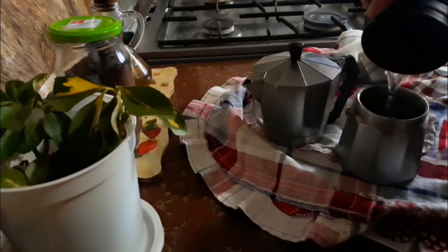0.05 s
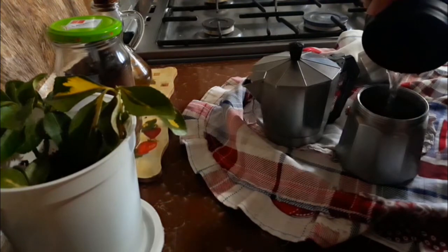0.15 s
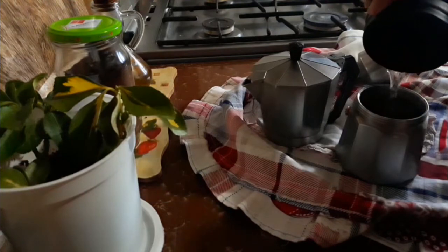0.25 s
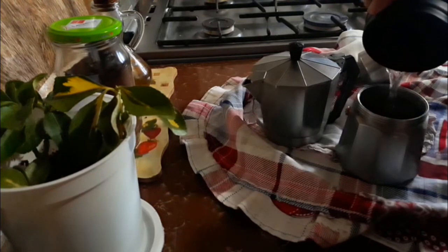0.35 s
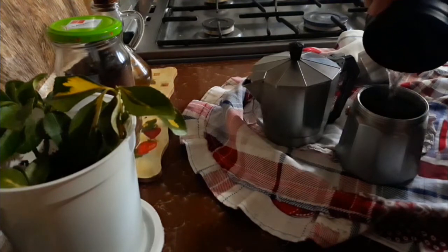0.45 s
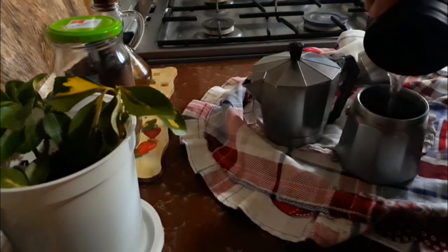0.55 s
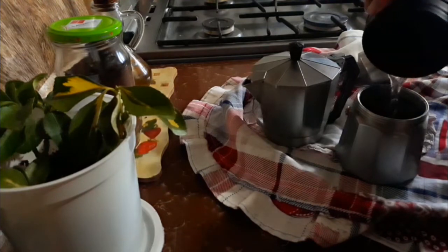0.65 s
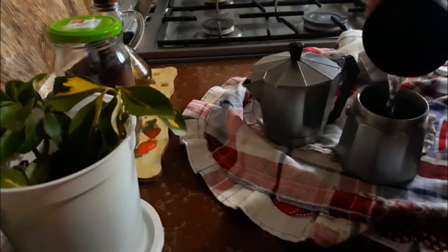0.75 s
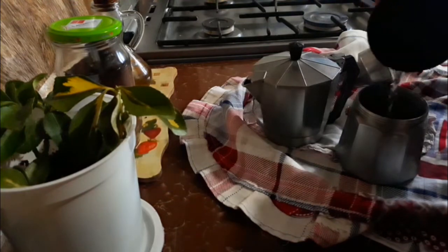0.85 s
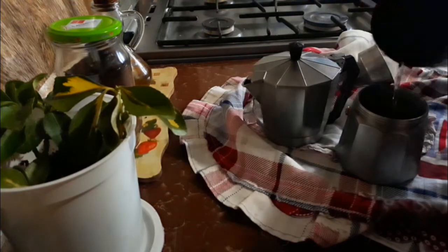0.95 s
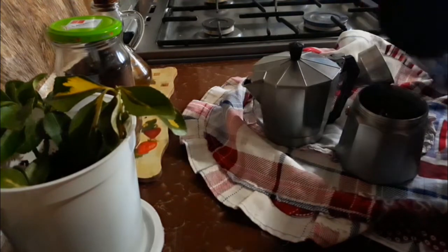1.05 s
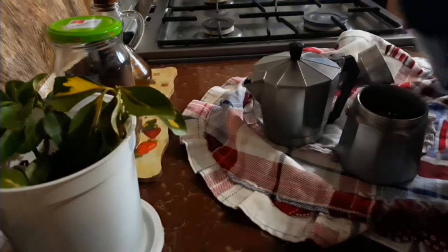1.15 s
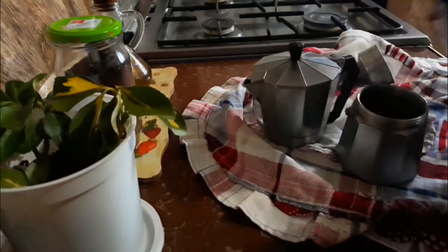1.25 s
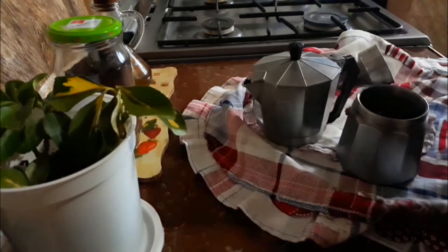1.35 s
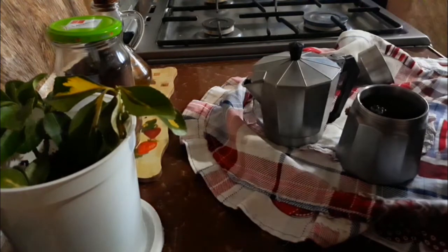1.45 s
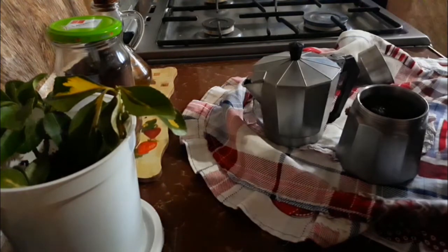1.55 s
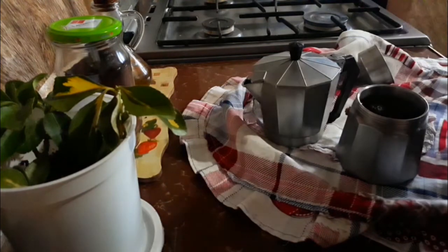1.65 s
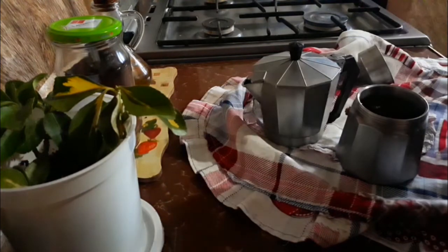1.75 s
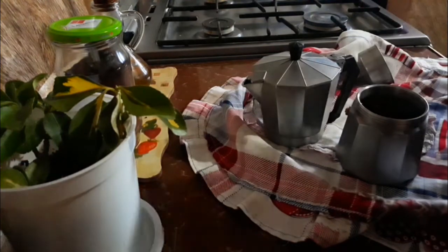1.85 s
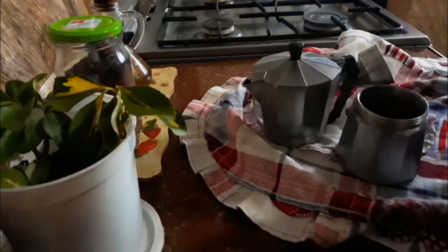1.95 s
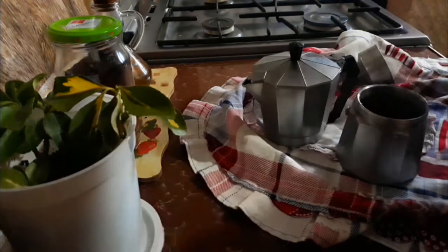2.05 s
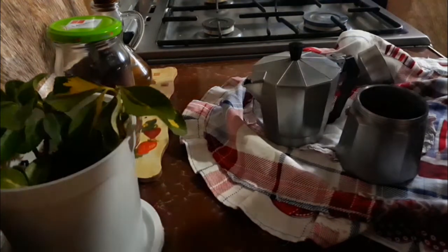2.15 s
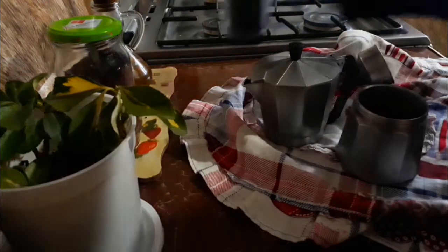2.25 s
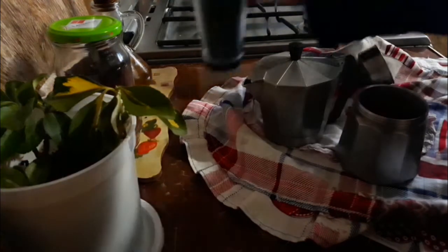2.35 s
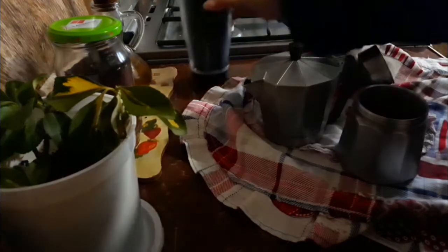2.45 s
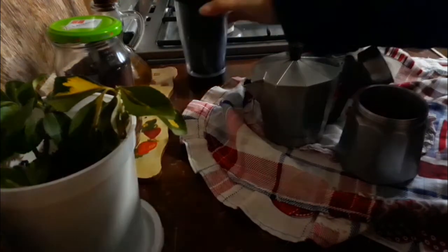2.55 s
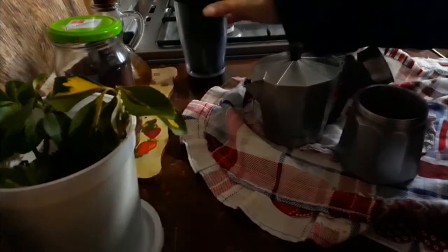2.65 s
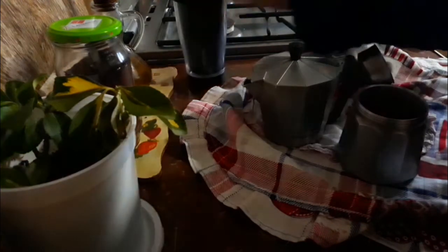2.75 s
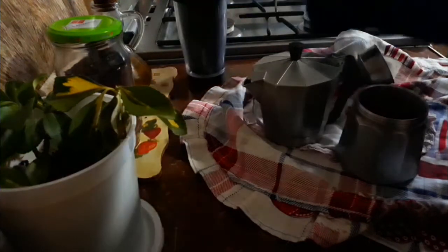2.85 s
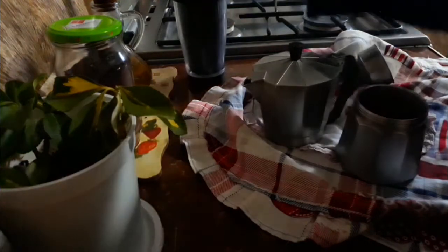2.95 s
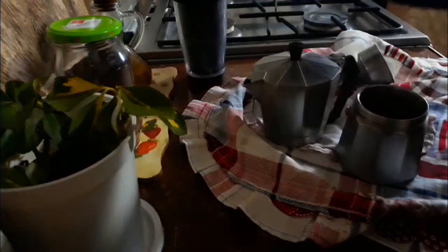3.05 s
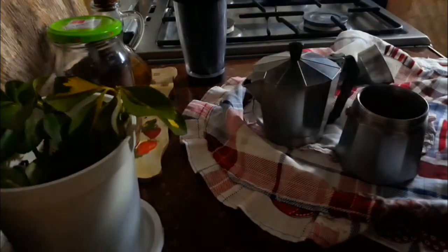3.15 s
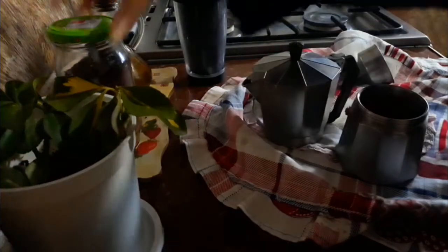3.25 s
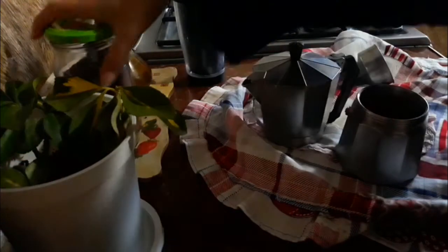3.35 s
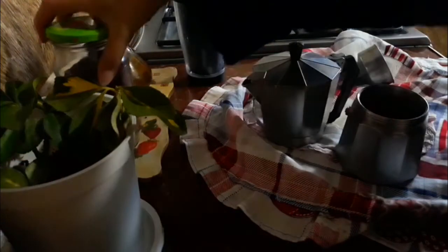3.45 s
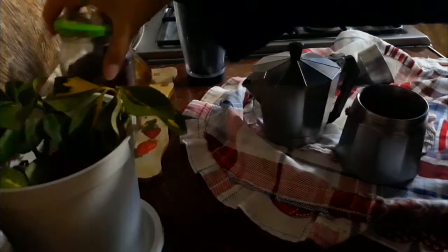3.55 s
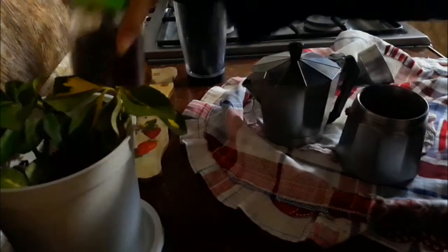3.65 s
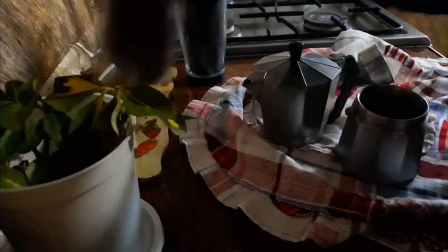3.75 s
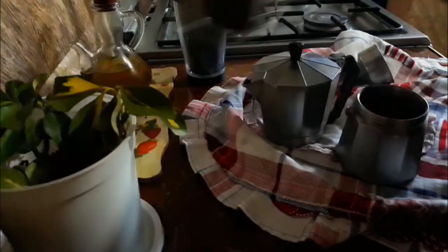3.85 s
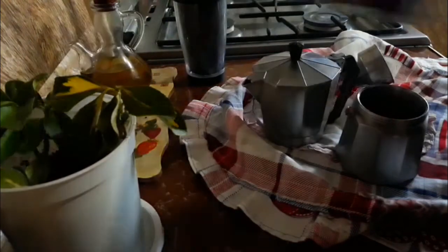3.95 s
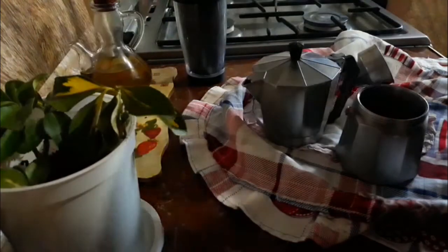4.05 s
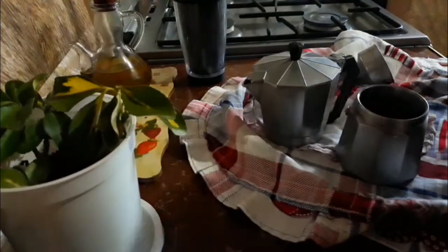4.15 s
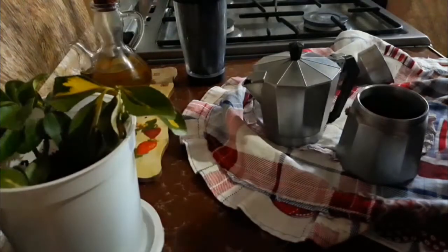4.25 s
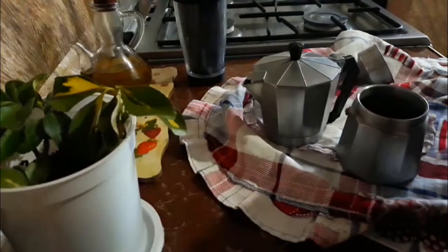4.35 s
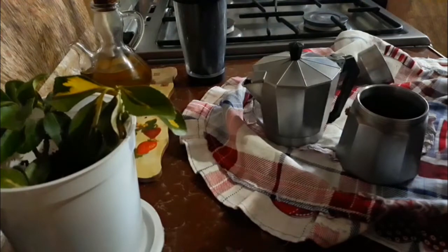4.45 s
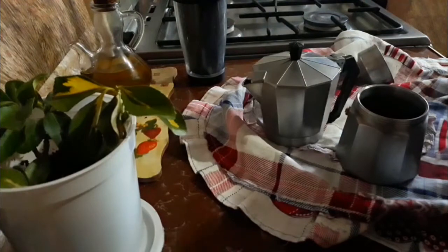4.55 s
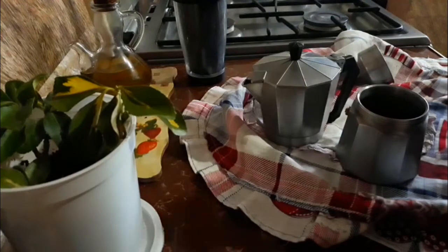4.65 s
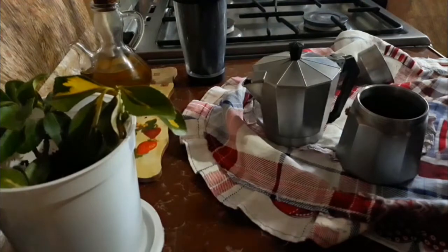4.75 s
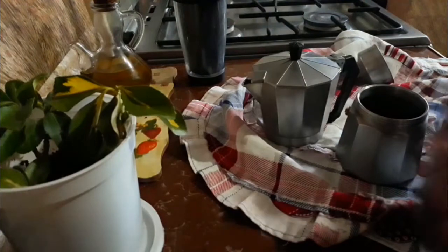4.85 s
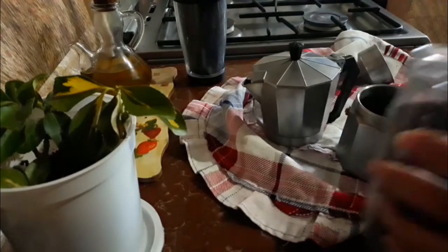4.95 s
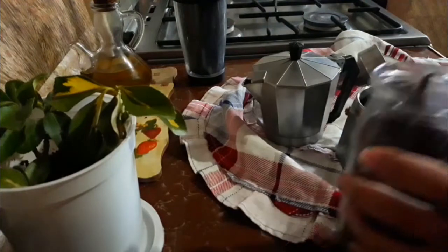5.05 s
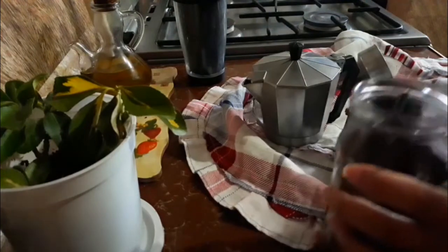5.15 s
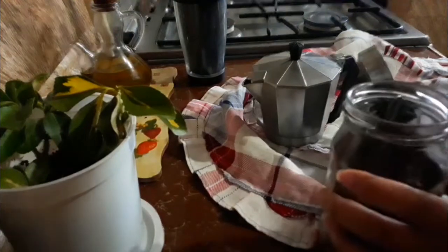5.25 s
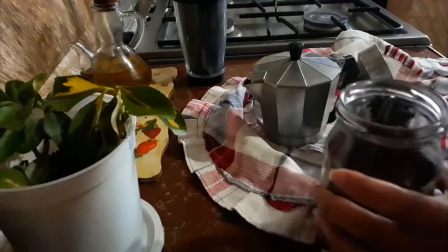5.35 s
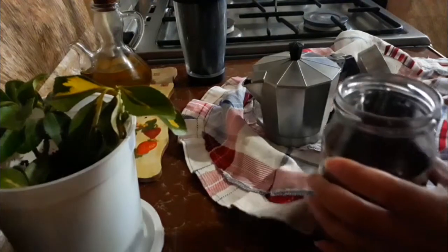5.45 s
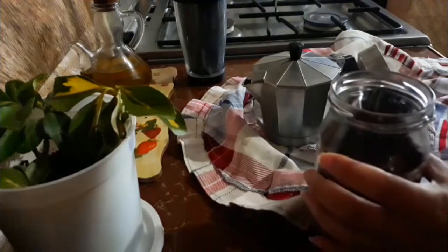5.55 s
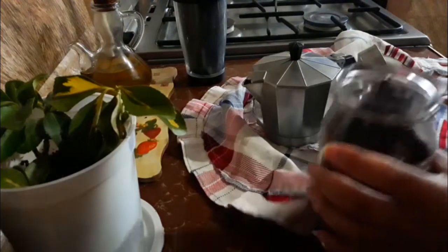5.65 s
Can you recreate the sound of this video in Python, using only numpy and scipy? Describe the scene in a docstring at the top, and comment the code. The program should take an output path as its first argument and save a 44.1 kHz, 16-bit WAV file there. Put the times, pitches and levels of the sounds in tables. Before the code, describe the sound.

A small, reverberant kitchen with a quiet low hum and faint hiss. From 0 to about 0.8 s thin water runs into a metal pot base: hollow bubbles and gurgles under a delicate, wavering high whistle-like tone. Around 0.85 s the stream breaks up with a small splash; plopping bubbles and crisp drops continue to about 1.25 s, then fizz and a few tiny drips near 1.7 to 1.9 s fade away. At 2.57 s a tumbler is set down with a loud, woody, resonant knock that echoes in the room. Near 3.4 s a glass jar stutters briefly off the counter. Very soft rustles at 4.1 s lead to a lid twisting from 4.42 to 4.6 s, with short scrapes, a hollow pop and small glassy catches. A deep dull counter thud comes at 5.26 s, a harder drawer bang at 5.43 s, and a very faint spoon clink at 5.59 s.

```python
"""A small, hard-walled kitchen over a low hum: thin water is poured into the metal base of a coffee pot.
The stream is a wavering sine; ringing bubbles and gurgles excite the pot, then it breaks into noisy drips.
A tumbler is put down on the wooden counter; a glass jar is picked up and its lid twisted off by tiny slips.
The counter thuds, a drawer bangs and a spoon clinks, all as decaying modes; diffuse noise tails are the room."""
import sys
import numpy as np
from scipy import signal
from scipy.fft import rfft, irfft
from scipy.io import wavfile
from scipy.ndimage import uniform_filter1d

SR = 44100
rng = np.random.default_rng(int(sys.argv[2]) if len(sys.argv) > 2 else 0)


def inscribe(sig):
    """Save sig as 16-bit PCM at rate SR to the path in sys.argv[1].

    A 1-D sig is mono; a 2-D sig holds one channel per row.
    Samples are clipped to [-1, 1] before scaling.
    """
    pcm = np.round(np.clip(np.atleast_2d(sig).T, -1, 1) * 32767)
    wavfile.write(sys.argv[1], SR, pcm.astype(np.int16))


N = 251370
TIME = np.arange(N) / SR
SECOND = TIME[:SR]


def amp(db):
    """Decibels to gain."""
    return 10 ** (np.asarray(db) / 20)


def unit(x):
    """Scales to rms 1."""
    return x / np.sqrt(np.mean(x ** 2) + 1e-20)


def read(points, hz):
    """Reads a curve joined by lines on a log-frequency axis."""
    f, value = np.transpose(points)
    return np.interp(np.log(hz + 1), np.log(f + 1), value)


def level(rows, column=1):
    """Gain over time from one dB column of a table, silent outside it."""
    rows = np.array(rows)
    return amp(np.interp(TIME, rows[:, 0], rows[:, column], left=-150, right=-150))


def add(mix, s, sound):
    """Mixes a sound in at time s, in place."""
    part = mix[max(round(s * SR), 0):][:len(sound)]
    part += sound[:len(part)]


def colour(x, spectrum, size=4096):
    """Causal (minimum-phase) filter of unit energy with the given spectrum."""
    hz = abs(np.fft.fftfreq(size, 1 / SR))
    log_gain = np.log(amp(np.maximum(read(spectrum, hz), -100)))
    taps = np.fft.ifft(np.exp(np.conj(signal.hilbert(log_gain)))).real
    return signal.fftconvolve(x, taps / np.linalg.norm(taps))[:len(x)]


def low_cut(x, hz, order=2):
    """High-pass filter: the microphone picks up little deep bass."""
    return signal.sosfilt(signal.butter(order, hz, "high", fs=SR, output="sos"), x)


def resonate(x, body):
    """Resonances side by side, each passed twice for steeper skirts."""
    out = np.zeros(len(x))
    for hz, width_hz, db in body:
        b, a = signal.iirpeak(min(hz, SR / 2 - 1), hz / width_hz, SR)
        once = signal.lfilter(b, a, x)
        out += amp(db) * signal.lfilter(b, a, once)
    return out


def fade(t60):
    """One second of exponential decay, falling 60 dB in t60 seconds."""
    return 1000 ** (-SECOND / max(t60, 1e-4))


def ring(modes):
    """Struck modes, neighbours swinging in opposite senses."""
    out = np.zeros(SR)
    for k, (hz, db, t60) in enumerate(modes):
        out += (-1) ** k * amp(db) * fade(t60) * np.sin(2 * np.pi * hz * SECOND)
    return out


def burst(t60, count=4):
    """Decaying noise with an even spectrum: a crowd of short modes."""
    x = rng.standard_normal(SR) * fade(t60)
    for _ in range(count):  # flatten the spectrum, then trim the length again
        z = rfft(x)
        x = irfft(z / (abs(z) + 1e-12), SR) * (SECOND < t60)
    return x * np.linalg.norm(fade(t60)) / np.linalg.norm(x)


def grains(per_s, spread_db):
    """Random clicks, mostly small, a few large."""
    hits = rng.random(N) < per_s / SR
    size_db = spread_db * np.minimum(rng.exponential(1, N), 4)
    return hits * rng.choice([-1, 1], N) * amp(size_db)


def stroke(s, hold_s, db, rise_s=0.0092, release_t60=0.05):
    """Force of one push: a quick rise, a hold, a release."""
    t = TIME - s
    released_s = np.maximum(t - rise_s - hold_s, 0)
    return amp(db - 60 * released_s / release_t60) * np.clip(t / rise_s, 0, 1)


def scuff(db, hz, share, t60):
    """A dying puff of noise around one pitch."""
    edges = [hz / (1 + share), min(hz * (1 + share), SR / 2 - 1)]
    band = signal.butter(2, edges, "band", fs=SR, output="sos")
    return amp(db) * fade(t60) * unit(signal.sosfilt(band, rng.standard_normal(SR)))


# how long each band lingers between the walls: pitch_hz, t60_s
ROOM_T60 = [(100, 0.78), (250, 0.54), (600, 0.63), (1500, 0.58), (4000, .55), (8000, 0.53), (15000, .25)]
# colour of the kitchen's answer: pitch_hz, level_db
ROOM_TONE = [(60, -6.5), (200, -3), (500, -7), (1500, 0), (3000, -3), (7000, 1), (15000, -7.5)]


def room(x, build_s=0.008):
    """The kitchen's diffuse answer, each band of noise dying at its own speed."""
    hz, t, z = signal.stft(rng.standard_normal(SR), SR, nperseg=256)
    decay_db = -60 * t / read(ROOM_T60, hz)[:, None]
    z = z * amp(read(ROOM_TONE, hz))[:, None] * amp(decay_db)
    tail = signal.istft(z, SR, nperseg=256)[1][:SR]
    tail *= 1 - np.exp(-(SECOND / build_s) ** 2)
    mean_t60 = np.mean(read(ROOM_T60, hz[:20]))
    return signal.fftconvolve(x, tail / np.linalg.norm(fade(mean_t60)))[:N]


# spectrum of the hum and its hiss: pitch_hz, level_db
HUM = [(20, -43.5), (40, -25.5), (52, -16.5), (65, -4.5), (110, -1), (155, -2), (200, -14), (260, -16.5),
       (400, -23.5), (700, -26.5), (1500, -30), (4000, -34), (8500, -33), (9700, -41), (16000, -34)]


def hum(hum_db=-66):
    """Low steady room noise under a faint hiss, shaped from white noise."""
    gain = amp(read(HUM, np.fft.rfftfreq(N, 1 / SR)))
    return amp(hum_db) * unit(irfft(rfft(rng.standard_normal(N)) * gain, N))


def squeal(length_s=0.04, start_hz=6100, sag_hz_per_s=8700, squeal_db=-55):
    """As the stream thins, the tone jumps up and sags for a moment."""
    t = TIME[TIME < length_s]
    tone = np.sin(2 * np.pi * np.cumsum(start_hz - sag_hz_per_s * t) / SR)
    return amp(squeal_db) * signal.windows.tukey(len(t)) * tone


# the smooth stream sings one thin tone: start_s, pitch_hz, level_db
SING = [(0.0, 5550, -74), (0.1, 5655, -66.5), (0.188, 5570, -74), (0.2, 5490, -64.5), (0.318, 5420, -57),
        (0.384, 5440, -58.5), (0.438, 5300, -66), (0.52, 5310, -66.5), (0.578, 5390, -61.5),
        (0.69, 5266, -62), (0.714, 4830, -70), (0.786, 5170, -61), (0.804, 5060, -61), (0.81, 4780, -65)]


def stream(waver=0.0012, flutter=0.18, octave_db=-14, octave_end_s=0.19, squeal_s=0.821):
    """The thin singing tone, with a faint octave at first and a short squeal at the end."""
    s, hz, _ = np.transpose(SING)
    drift = unit(uniform_filter1d(rng.standard_normal(N), size=400))
    swell = unit(uniform_filter1d(rng.standard_normal(N), size=400))
    phase = 2 * np.pi * np.cumsum(np.interp(TIME, s, hz) * (1 + waver * drift)) / SR
    octave = amp(octave_db) * (TIME < octave_end_s) * np.sin(2 * phase)
    out = level(SING, column=2) * (np.sin(phase) + octave)
    add(out, squeal_s, squeal())
    return np.sqrt(2) * (1 + flutter * swell) * out  # root two: levels are rms


def bubble(hz, t60, rise=0.03, swell_cycles=2.8):
    """A bubble swells for a few cycles, rings, and rises in pitch as it nears the surface."""
    t = TIME[:SR // 6]
    shape = fade(t60)[:len(t)] * (1 - np.exp(-t * hz / swell_cycles))
    pitch = hz * (1 + rise * np.minimum(t / t60, 1))
    return shape * np.sin(2 * np.pi * np.cumsum(pitch) / SR)


def bubble_swarm(pitches, per_s, spread_db, t60):
    """Random tiny bubbles at each of several pitches."""
    return sum(signal.oaconvolve(grains(per_s, spread_db), bubble(hz, t60))[:N] for hz in pitches)


# the pour, as the level of its small bubbles: start_s, level_db
FLOW = [(0, -67.5), (.3, -83), (.7, -72.5), (.82, -79), (.89, -60), (1.0, -67.5), (1.17, -70.5),
        (1.27, -71.5), (1.35, -110)]
# resonances of the air in the pot, width per pass: pitch_hz, width_hz, level_db
POT_AIR = [(750, 76, 2.5), (1516, 210, 6.5), (1890, 140, 4), (2200, 360, 0), (3800, 350, -28)]


def pour(low_hz=1100, high_hz=3900, gurgle_db=0):
    """A crowd of small bubbles, and random clicks gurgling through the air in the pot."""
    small = bubble_swarm(np.geomspace(low_hz, high_hz, num=24), per_s=30, spread_db=6, t60=0.0045)
    gurgle = resonate(grains(790, 1.7), POT_AIR)
    return level(FLOW) * (unit(small) + amp(gurgle_db) * unit(gurgle))


# fizz on the water, which outlasts the pour: start_s, level_db
FROTH = [(0, -80.5), (.6, -76), (.83, -67), (.87, -61.5), (1.05, -68), (1.2, -76), (1.4, -82.5),
         (1.7, -73.5), (2.3, -85.5)]
# colour of the fizz: pitch_hz, level_db
FIZZ = [(150, -34), (400, 6.5), (1500, -1.5), (3000, -6.5), (5000, 2.5), (8500, 2), (10000, -15.5),
        (15500, -10.5)]


def froth(spatter_db=-4):
    """Coloured clicks fizz among tiny bubbles; the level surges as the stream collapses with a splash."""
    spatter = bubble_swarm(np.geomspace(4500, 9000, num=12), per_s=25, spread_db=2.5, t60=0.0015)
    fizz = unit(colour(grains(2500, 4), FIZZ))
    splash = stroke(0.849, hold_s=0.0077, db=-56)
    return (level(FROTH) + splash) * (fizz + amp(spatter_db) * unit(spatter))


def cluster(hz, t60, scatter=0.136, lag_s=0.007, size_db=-9, count=4):
    """A pocket of air breaks into one main bubble and a few smaller neighbours."""
    out = bubble(hz, t60)
    for detune, delay in zip(rng.standard_normal(count), rng.exponential(lag_s, count)):
        add(out, delay, amp(size_db) * bubble(hz * np.exp(scatter * detune), t60 / 2))
    return out


# the larger trapped air bubbles: start_s, level_db, pitch_hz
BUBBLES = [(.044, -43, 1816), (.057, -41.5, 3370), (.118, -50, 3550), (.158, -50.5, 3490),
           (.186, -53.5, 2024), (.2495, -45, 1604), (.261, -42, 2110), (.286, -46, 2340), (.328, -42, 1468),
           (.468, -42, 2330), (.589, -51, 1926), (.662, -50.5, 1350), (.733, -48, 1363), (.736, -49, 2220),
           (.911, -39, 2100), (.913, -41.5, 1000), (0.9567, -44, 1046), (.957, -42, 1637),
           (1.046, -37.5, 1110), (1.047, -43, 3750), (1.123, -48, 2740), (1.1305, -38.5, 1198),
           (1.141, -41.5, 1392), (1.218, -55, 667), (1.253, -51, 783)]


def large_bubbles(t60_at_1khz=0.061, damping=0.69, stir_db=-13, stir_t60=0.052):
    """Each bubble rings, nudges the pot's air column, and its splash stirs the air in the pot."""
    out, stir = np.zeros(N), np.zeros(N)
    for s, db, hz in BUBBLES:
        t60 = t60_at_1khz * (1000 / hz) ** damping  # smaller bubbles die sooner
        add(out, s, amp(db) * cluster(hz, t60))
        add(stir, s, amp(db + stir_db) * fade(stir_t60))
        add(out, s, scuff(db - 26, hz=725, share=0.09, t60=0.12))  # the air column
    return out + stir * unit(resonate(rng.standard_normal(N), POT_AIR))


# colour of a slap on the surface: pitch_hz, level_db
SLAP = [(300, -40), (900, -16.5), (2500, 0), (4500, -3.5), (7500, 2.5), (10000, -4.5), (15500, -1.5)]


def drop(hz, slap_db=-9, slap_t60=0.025, ping_db=-5, ping_t60=0.017):
    """A drop slaps the surface and leaves tiny pinging bubbles."""
    out = amp(slap_db) * colour(burst(slap_t60), SLAP)
    pings = cluster(hz, ping_t60, scatter=0.087, lag_s=0.0015, size_db=-11.5)
    add(out, 0, amp(ping_db) * pings)
    return out


# the larger drops, with the pitch of the tiny bubble left behind: start_s, level_db, pitch_hz
DROPS = [(0.187, -49.5, 11400), (0.2492, -47, 8500), (0.3388, -44.5, 8600), (0.566, -48, 8500),
         (.7067, -48, 6400), (0.8581, -38, 4700), (0.9562, -42.5, 14800), (0.9788, -41.5, 13200),
         (1.0457, -36, 5600), (1.0629, -37, 15800), (1.0937, -38.5, 6350), (1.1229, -37.5, 6660),
         (1.219, -50, 3570), (1.6615, -45.5, 8530), (1.879, -48.5, 8600), (1.907, -47.5, 4480)]


def drips(specks_per_s=14, specks_start_s=1.2, specks_end_s=2.6, speck_hz=8410, speck_db=-60):
    """Larger drops slap the water; specks of froth burst afterwards."""
    out = np.zeros(N)
    for s, db, hz in DROPS:
        add(out, s, amp(db) * drop(hz))
    specks = grains(specks_per_s, 2) * (TIME > specks_start_s) * (TIME < specks_end_s)
    return out + amp(speck_db) * signal.oaconvolve(specks, drop(speck_hz))[:N]


def water(pot_db=-3, pot_t60=0.058, room_db=-7, tone_room_db=-19):
    """Bubbles rattle around inside the pot; fizz, drops and the singing stream sound on top."""
    wet = pour() + large_bubbles()
    walls = burst(pot_t60)
    rattle = signal.fftconvolve(wet, walls / np.linalg.norm(walls))[:N]
    out = wet + amp(pot_db) * rattle + froth() + drips()
    tone = stream()
    return out + amp(room_db) * room(out) + tone + amp(tone_room_db) * room(tone)


# tumbler, counter, drawer in turn: start_s, ring_db, crack_db, crack_t60_s, room_db
KNOCKS = [(2.5728, -11.5, -7.5, 0.044, 17), (5.262, -26.5, -13, 0.044, 7.5), (5.4262, -19, -8.5, .035, 15)]
# the long modes each blow rings with: pitch_hz, level_db, t60_s
TUMBLER = [(85.3, -15, 0.054), (158.3, -19, 0.31), (209.8, -13, 0.032), (247, -8, .22), (317, -11, .12),
           (384, -4, 0.22), (539, -14, 0.26), (594, -3.5, .16), (723, -11, .08), (803, -5, 0.11),
           (1055, -12, 0.078), (1264, -20, 0.055), (1372.7, -13, .03), (1687, -22, .08)]
COUNTER = [(114.9, 3, 0.57), (152, -2.5, 0.41), (182, -15.5, 0.042), (243.7, -6, 0.27), (304, -12, 0.09)]
DRAWER = [(116.2, -11.5, 0.41), (244.6, -20.5, 0.61), (271, 2, 0.094), (490, -5.5, 0.07), (537, -8, 0.22),
          (708, -5, 0.21), (1095, 0, 0.055), (1465, -6, 0.07), (1580, -6.5, 0.012), (1685, -26.5, 0.47)]
# colour of each blow's dense, fast-dying modes: pitch_hz, level_db
TUMBLER_CRACK = [(35, -44.5), (60, -18), (229, 0), (480, -2), (619, 0.5), (835, -15), (916, -14),
                 (1360, -13.5), (1560, -27.5), (2310, -23), (2840, -33.5), (7500, -47), (9670, -65.5),
                 (15000, -76.5)]
COUNTER_CRACK = [(24, -32), (40, -6.5), (129, 1.5), (292, -2), (623, -22), (847, -32), (979, -44.5),
                 (1190, -45), (1590, -55), (3000, -72.5), (3900, -100), (6600, -120)]
DRAWER_CRACK = [(35, -30.5), (60, -11), (271, 0), (629, -1.5), (917, -11), (1070, -4), (1310, -14.5),
                (1630, -5.5), (1910, -28), (2230, -19.5), (2720, -34.5), (3170, -28.5), (12000, -83),
                (15600, -111), (22000, -120)]
# what each blow throws into the room: pitch_hz, level_db
TUMBLER_FAR = [(60, -39.5), (120, -8), (180, -15), (270, 3), (400, -4), (600, 2), (820, -6), (1000, -13),
               (1450, -17), (2000, -27), (2800, -31), (4000, -42.5), (8500, -54), (11000, -69)]
COUNTER_FAR = [(41, -34.5), (70, -23), (102, -10), (118, -1.5), (145, -12), (273, -7), (455, -12),
               (504, -16.5), (1500, -61.5), (1950, -101), (3300, -120)]
DRAWER_FAR = [(53, -12.5), (90, -21), (118, -13), (149, -7), (231, -2), (347, 0), (540, 4.5), (874, -7),
              (1100, -4), (1240, -10), (1440, -8), (3060, -25.5), (4500, -46), (9000, -63.5), (11700, -60),
              (19800, -120)]


def knocks(ring_room_db=-14, contact_s=0.00032, bass_hz=78):
    """Tumbler, dull thud and drawer: a few long modes, a crack of short ones, and the room's answer."""
    out = np.zeros(N)
    press = 1 - np.exp(-(SECOND / contact_s) ** 2)  # contact builds up over a moment
    bodies = [(TUMBLER, TUMBLER_CRACK, TUMBLER_FAR),
              (COUNTER, COUNTER_CRACK, COUNTER_FAR),
              (DRAWER, DRAWER_CRACK, DRAWER_FAR)]
    for (s, ring_db, crack_db, t60, room_db), (modes, crack, far) in zip(KNOCKS, bodies):
        rung = amp(ring_db) * ring(modes) * press
        cracked = amp(crack_db) * colour(burst(t60) * press, crack)
        thrown = amp(room_db) * colour(signal.unit_impulse(SR), far) + amp(ring_room_db) * rung
        add(out, s, rung + cracked)
        add(out, s, room(thrown))
    return low_cut(out, bass_hz, order=4)


# brief scuffs of fingers, sleeve and lid; the band reaches a factor 1 + share either side of its pitch:
# start_s, level_db, pitch_hz, share (ratio), t60_s
TOUCHES = [(2.74, -62.5, 8300, 0.1, 0.086), (3.112, -68, 2650, .05, 0.26), (4.075, -69.5, 6500, .45, 1),
           (4.08, -76, 14370, .17, 0.25), (4.15, -68, 7460, 1, 0.26), (4.231, -75.5, 7300, .2, 0.71),
           (4.416, -56.5, 3000, 1, 0.13), (4.429, -38, 948, 0.14, .083), (5.132, -67, 4400, 0.78, 0.91),
           (5.133, -69, 3104, .035, 0.4), (5.478, -67.5, 8200, 0.049, .34), (5.592, -53, 8600, 1, 0.36)]


def touches():
    """Fingers, sleeve and lid brush past as dying puffs of filtered noise."""
    out = np.zeros(N)
    for s, *touch in TOUCHES:
        add(out, s, scuff(*touch))
    return out


def rub(pushes, body, slips_per_s, spread_db, room_db):
    """Tiny slips under each push excite the resonances of the rubbed thing."""
    force = sum(stroke(*push) for push in pushes)
    out = force * unit(resonate(grains(slips_per_s, spread_db), body))
    return out + amp(room_db) * room(out)


# the jar slides off the counter in short pushes: start_s, hold_s, level_db
SLIDE = [(3.36, 0.16, -68), (3.405, 0.022, -56), (3.44, 0.0078, -48)]
# its resonances, width per pass: pitch_hz, width_hz, level_db
SLIDE_BODY = [(161.3, 280, -3.5), (373.3, 136, 0), (736.5, 41, 0.5), (1150, 130, -14), (1830, 240, -11),
              (2600, 266, -12), (3720, 660, -17.5), (6700, 3100, -30.5)]


def jar_slide():
    """The jar stutters off the counter, slip by slip."""
    return rub(SLIDE, SLIDE_BODY, slips_per_s=7500, spread_db=6, room_db=-2.5)


# the glass rings when it catches: start_s, level_db
CATCHES = [(3.41, -66.5), (3.451, -59.5), (4.452, -53.5), (4.588, -56)]
# modes of the glass: pitch_hz, level_db, t60_s
JAR = [(1640, 3, 0.1), (1890, -9, 0.11), (2640, -8, 0.11), (3660, -7, 0.18)]


def jar_ring():
    """Each catch sets the same few glass modes ringing."""
    out = np.zeros(N)
    for s, db in CATCHES:
        add(out, s, amp(db) * ring(JAR))
    return out


# the lid gives, turns, and catches twice: start_s, hold_s, level_db
TWIST = [(4.423, 0.028, -38.5), (4.48, 0.093, -53), (4.553, 0.0023, -47.5), (4.582, .005, -44.5)]
# its resonances, width per pass: pitch_hz, width_hz, level_db
LID_BODY = [(369.6, 216, -3), (520, 37, 3.5), (937, 510, -13), (1656, 47, -12.5), (2580, 820, -17),
            (3300, 188, -15.5), (5100, 1600, -24), (8470, 1180, -24), (13700, 9400, -35.5)]


def lid_twist():
    """The lid grinds round on its glass, slip by slip."""
    return rub(TWIST, LID_BODY, slips_per_s=3800, spread_db=0.5, room_db=-7)


def lid_pop():
    """The lid comes free with a hollow pop: a narrow, short puff of noise."""
    return scuff(-32.5, hz=424, share=0.18, t60=0.088)


# modes of the spoon: pitch_hz, level_db, t60_s
CLINK = [(6450, 1, 0.26), (6610, -6, 0.18), (7590, -6, 0.22), (8300, -3, 0.26), (10277, -14, 0.13),
         (11500, -9, 0.39), (12629, -12, .2), (14040, -13, .2)]


def spoon(clink_db=-60):
    """A faint clink of high metal modes."""
    return amp(clink_db) * ring(CLINK)


def handling(pop_s=4.465, clink_s=5.592, room_db=-4):
    """Scuffs, the ring of the jar, the pop of its lid and the spoon, with the room around them."""
    out = touches() + jar_ring()
    add(out, pop_s, lid_pop())
    add(out, clink_s, spoon())
    return out + amp(room_db) * room(out)


def scene():
    """Pouring, then work on the counter."""
    return (hum() + water() + knocks() + handling() + jar_slide() + lid_twist())[None]


def record(dry, edge_hz=15950):
    """Band limit: a steep linear-phase low-pass, centred so that nothing is delayed."""
    taps = signal.firwin(511, edge_hz, window=("kaiser", 9), fs=SR)
    return signal.oaconvolve(dry, taps[None], "same")


dry = scene()
out = record(dry)
inscribe(out)
```